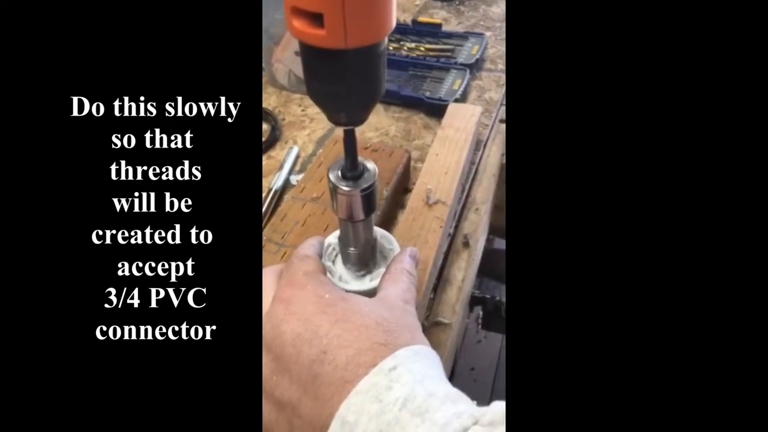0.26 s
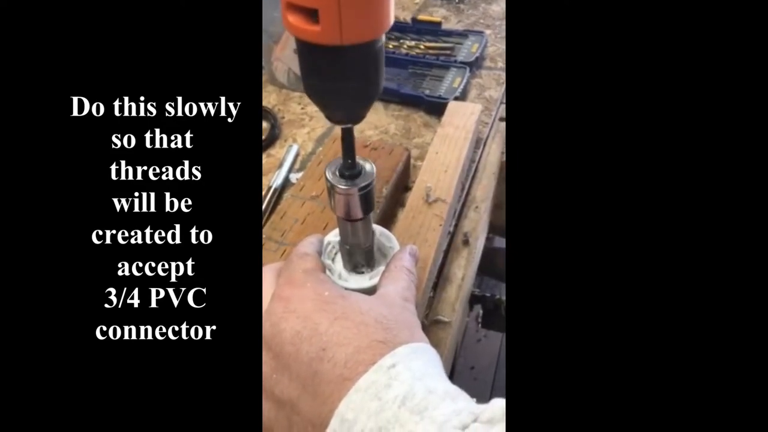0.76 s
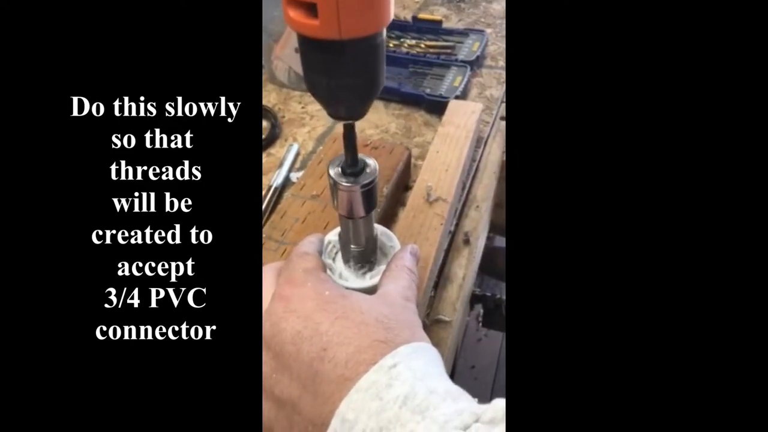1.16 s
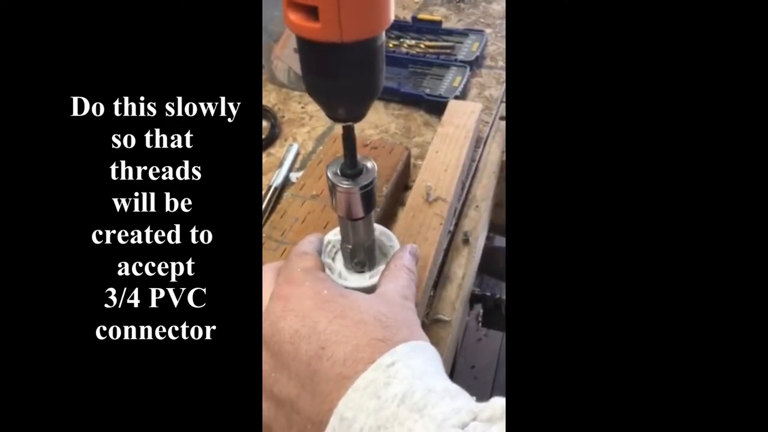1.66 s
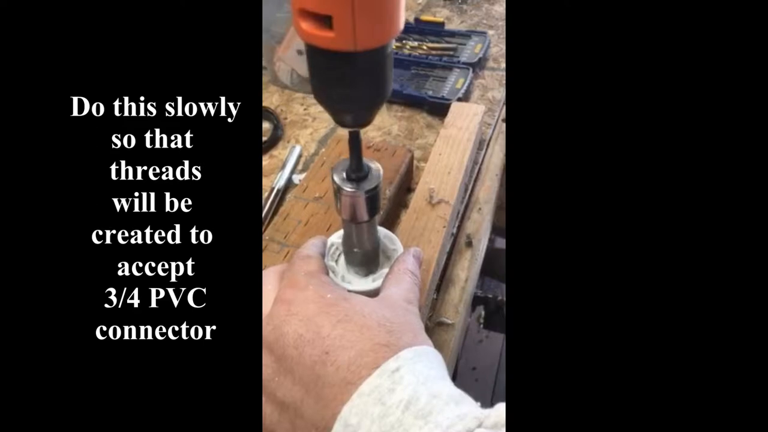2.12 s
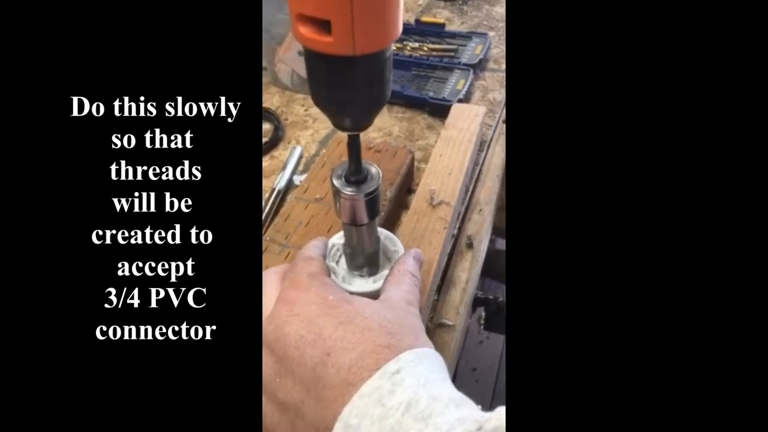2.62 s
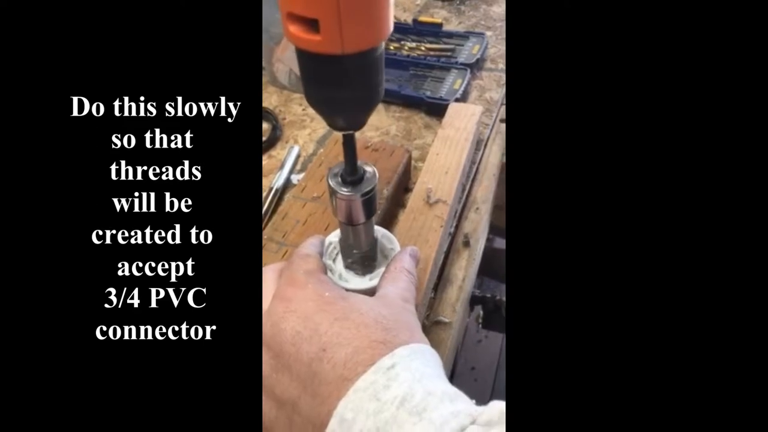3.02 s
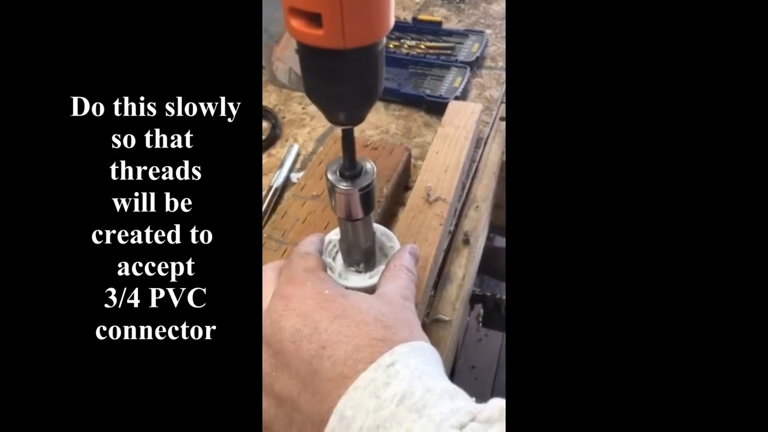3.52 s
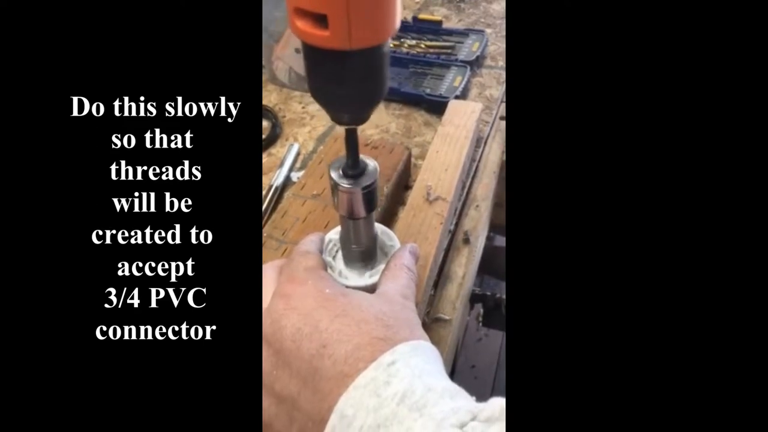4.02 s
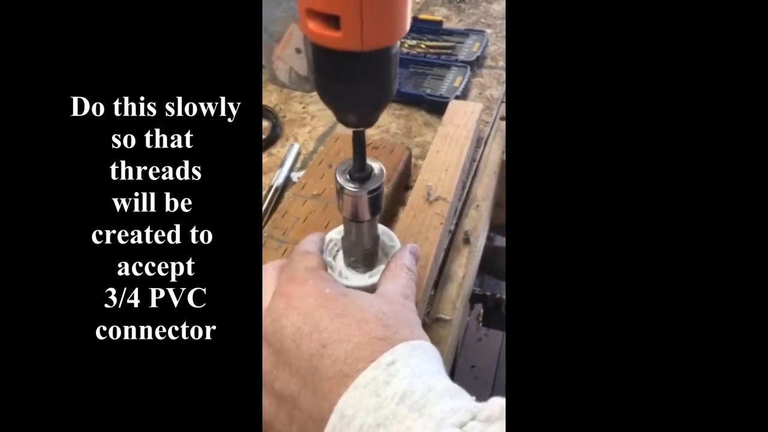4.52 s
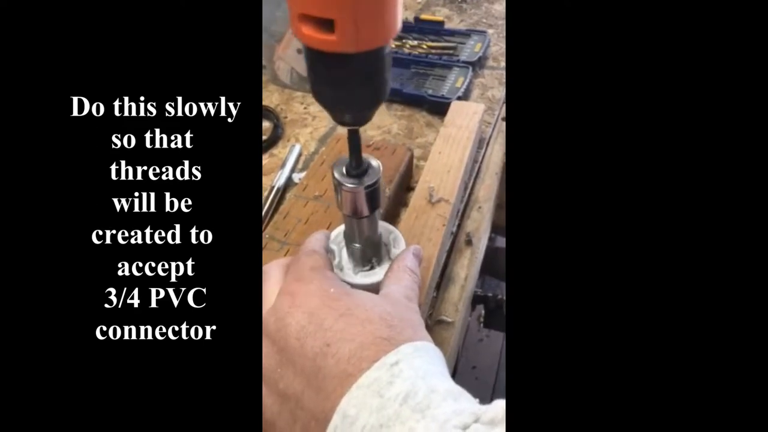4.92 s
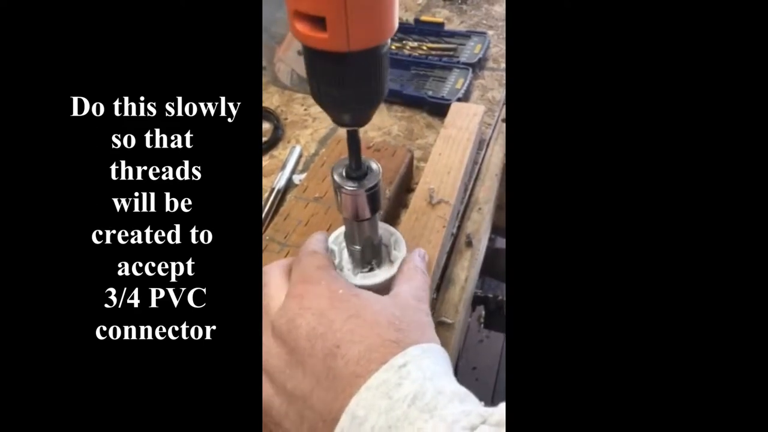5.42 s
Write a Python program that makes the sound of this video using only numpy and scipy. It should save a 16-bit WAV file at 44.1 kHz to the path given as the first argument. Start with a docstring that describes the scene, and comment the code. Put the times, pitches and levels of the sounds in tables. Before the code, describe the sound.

A cordless drill drives a threading tap into a plastic fitting, close to the microphone in a small dry workshop. It opens with a half-second run, the clutch ratcheting in a quick rattle, then continues in short bursts, two or three a second. Louder, faster bursts at about 1.3, 2.2, 4.0 and 4.5 seconds rise to a rasping buzz and fall away in a brief whine. Softer rattles fill the stretch from 2.5 to 3.8 seconds. Sharp clicks of the trigger, chuck and biting tap mark the bursts, over faint plastic scraping. The fitting thuds on the workbench, hardest at around 1.45 seconds. A last strong burst comes near 4.9 seconds, and the work stops with a few ticks by 5.2 seconds. Quiet room air and a low hum remain, with one small click and a very faint, high, wavering whistle around 5.5 seconds.

```python
"""A workbench in a small dry room: close in front of the microphone, a cordless drill drives a threading tap
into a hand-held plastic fitting, in squeezes of the trigger. Under the load its clutch ratchets: clicks when slow,
a rattle when faster, a rasping buzz at the top, made of impulses that ring the gearbox and the tap.
Random knocks and hard jolts excite bench modes, the trigger and slack chuck tick, filtered noise grains scrape.
Behind it lie shaped noise for the workshop air, a low sine hum and a faint wavering whistle."""
import sys
import numpy as np
from scipy import signal
from scipy.fft import rfft, irfft
from scipy.io import wavfile
from scipy.ndimage import uniform_filter1d

SR = 44100
rng = np.random.default_rng(int(sys.argv[2]) if len(sys.argv) > 2 else 0)


def write(x):
    x = np.atleast_2d(x).T
    wavfile.write(sys.argv[1], SR, np.round(np.clip(x, -1, 1) * 32767).astype(np.int16))


N = 250047
TIME = np.arange(N) / SR  # seconds


def undb(db):
    """Decibels to gain."""
    return 10 ** (np.asarray(db) / 20)


def curves(rows):
    """Each column of a table, joined by straight lines in time."""
    times, *columns = np.transpose(sorted(map(tuple, rows)))
    return [np.interp(TIME, times, column) for column in columns]


def unit(x):
    """Scale to rms 1."""
    return x / np.sqrt(np.mean(x ** 2))


def wander(rate_hz):
    """A random curve with a spread near 1: random points, rate_hz a second, joined by straight lines."""
    knots = np.arange(0, N / SR + 1, 1 / rate_hz)
    return 1.2 * np.interp(TIME, knots, rng.standard_normal(len(knots)))


def through(x, impulse_response):
    """Pass a sound through an impulse response."""
    return signal.fftconvolve(x, impulse_response)[:N]


def response(colour, rings=(), size=8192):
    """Causal (minimum-phase) impulse response of unit energy from a broad colour and resonances."""
    hz = np.maximum(np.arange(size // 2 + 1) * SR / size, 1)
    points_hz, points_db = np.transpose(colour)
    db = np.interp(np.log(hz), np.log(points_hz), points_db)
    for centre, width, height in rings:
        db = db + height / (1 + (2 * (hz - centre) / width) ** 2)
    # folding the cepstrum forward in time makes the response causal
    cepstrum = irfft(np.log(undb(db)))
    cepstrum[1:size // 2] *= 2
    cepstrum[size // 2 + 1:] = 0
    h = irfft(np.exp(rfft(cepstrum)))
    return h / np.linalg.norm(h)


def fade(t60):
    """Exponential decay down to -60 dB in t60 seconds."""
    return np.exp(-np.log(1000) * TIME[:int(t60 * SR) + 2] / t60)


def tail(t60):
    """Dense room reflections of unit energy: decaying noise."""
    decay = fade(t60)
    h = decay * rng.standard_normal(len(decay))
    return h / np.linalg.norm(h)


def impulses(times, sizes, order=6):
    """Band-limited impulses at exact times, between the samples too."""
    place = np.asarray(times)[:, None] * SR
    index = place.astype(int) + np.arange(-order, order + 1)
    shape = np.sinc(index - place) * np.sinc((index - place) / (order + 1))
    weights = np.asarray(sizes)[:, None] * shape
    return np.bincount(np.clip(index, 0, N - 1).ravel(), weights.ravel(), N)


def chatter(pulses, t60):
    """Loose parts buzz briefly after each blow, with the energy of the blow."""
    decay = fade(t60) ** 2
    energy = np.abs(through(pulses ** 2, decay / decay.sum()))
    return np.sqrt(energy) * rng.standard_normal(N)


def disperse(x, spread_s, size=4096):
    """Bending waves reach the air by many paths: each frequency comes a little late, none is louder."""
    bins = np.arange(size // 2 + 1)
    delay = spread_s * np.interp(bins, np.linspace(0, size // 2, 60), rng.random(60))
    phase = -2 * np.pi * np.cumsum(delay) * SR / size
    lead = size // 8  # room for what the filter spreads ahead of its centre
    h = np.roll(irfft(np.exp(1j * phase)), lead)
    return signal.fftconvolve(x, h)[lead:lead + N]


# The colour of the workshop air behind the bench.
# Each row: frequency in Hz, relative density in dB per Hz.
SHOP_AIR = [(30, -23), (65, -4), (110, -10), (200, -14), (480, -29), (1800, -30.5), (3000, -36),
            (6500, -43.5), (10000, -45)]
# A faint whistle in the background, coming up after the drilling; the end values hold outside the rows.
# Each row: time in seconds, frequency in Hz, peak level in dB.
WHISTLE_PATH = [(5.33, 7590, -90.5), (5.36, 7950, -69), (5.39, 8100, -70.5), (5.42, 7870, -65),
                (5.455, 7470, -81), (5.49, 7700, -76), (5.515, 8270, -72.5), (5.56, 8700, -100),
                (5.62, 8250, -76), (5.67, 6870, -82.5)]


def workshop(air_db=-52.5, side_db=-30.0, hum_hz=61, hum_db=-50):
    """Quiet room air as shaped noise, a low machine hum as a sine and a thin whistle as a gliding sine."""
    colour = response(SHOP_AIR)
    mid = unit(through(rng.standard_normal(N), colour))
    side = unit(through(rng.standard_normal(N), colour))
    air = undb(air_db) * (mid + undb(side_db) * side * np.array([[1], [-1]]))
    hum = np.sqrt(2) * undb(hum_db) * np.sin(2 * np.pi * hum_hz * TIME)  # hum_db is its rms
    whistle_hz, whistle_db = curves(WHISTLE_PATH)
    whistle = undb(whistle_db) * np.sin(2 * np.pi * np.cumsum(whistle_hz) / SR)
    return air + hum + whistle


def scrape(rate_hz, level_db=-54, turning_db=4, grain_db=3, flicker_db=3):
    """The tap and the gripping hand rub on the plastic in a dull, uneven rustle, louder while the tap turns."""
    chance = rng.standard_normal((N // 10, 2))
    sizes = chance[:, 0] * undb(grain_db * chance[:, 1])
    grains = impulses(rng.uniform(0, N / SR, len(chance)), sizes)
    plastic = response([(100, -17.5), (280, -11.5), (450, -11), (1100, -9.0), (2000, -7.5), (4000, -8),
                        (7000, -16.0), (10000, -24.0)], TOOL_RINGS)
    rustle = unit(disperse(through(grains, plastic), spread_s=.002))
    turning = np.clip((rate_hz - CRAWL_HZ) / 100, 0, 1)
    working = np.clip((5.2 - TIME) / .08, 0, 1)  # silent from 5.2 s on
    return rustle * undb(level_db + turning_db * turning + flicker_db * wander(rate_hz=17)) * working


# The modes of the workbench under the fitting.
# Each row: frequency in Hz, width in Hz, relative level in dB.
BENCH_MODES = [(74, 78, 0), (92.8, 26, 1), (136, 92, -3.5), (163, 41, 0.5), (199, 27, -6), (287, 55, -7.5),
               (407, 102, -16), (650, 270, -17)]
# Hard jolts of the fitting against the bench.
# Each row: time in seconds, relative peak level in dB.
FITTING_JOLTS = [(.134, -25.5), (1.403, -18), (1.435, -8.5), (1.456, -5.5), (1.483, -16), (1.53, -20),
                 (1.97, -28), (2.208, -22), (2.295, -13), (2.333, -17.5), (3.561, -21.5), (4.071, -18),
                 (4.134, -20.5), (4.526, -20), (4.596, -17), (5.02, -22)]


def bench(rumble_db, grain_db=4, trim_db=-5.0, jolt_db=-1):
    """The shaking fitting bumps on the bench: many small knocks ring its modes, a few hard jolts thud."""
    t = TIME[:SR // 4]
    modes = 0
    for k, (hz, width, db) in enumerate(BENCH_MODES):
        ringing = np.exp(-np.pi * width * t) * np.sin(2 * np.pi * hz * t)
        modes = modes + undb(db) * np.sqrt(width) * ringing * (-1) ** k
    chance = rng.standard_normal((N // 150, 2))
    knock_times = np.sort(rng.uniform(0, N / SR, len(chance)))
    knocks = impulses(knock_times, np.sign(chance[:, 0]) * undb(grain_db * chance[:, 1]))
    working = np.clip((5.2 - TIME) / .1, 0, 1)  # silent from 5.2 s on
    rumble = unit(through(knocks, modes)) * undb(rumble_db + trim_db) * working
    jolt_times, peak_db = np.transpose(FITTING_JOLTS)
    thud = response([(25, -29.5), (60, 5.5), (100, 4), (220, -3.0), (400, -16), (900, -30.5), (3000, -46.5)])
    jolts = through(impulses(jolt_times, undb(peak_db + jolt_db)), thud / np.abs(thud).max())
    return rumble + jolts


# Bright clicks of the trigger and the slack chuck, close to the microphone.
# Each row: time in seconds, relative level of the metal snap in dB, relative level of the housing knock in dB.
TRIGGER_AND_CHUCK = [(.016, -33.5, -45), (.031, -33, -24), (.541, -39, -47), (.8824, -31, -37),
                     (1.2, -33.5, -48), (1.231, -31, -18.5), (1.6836, -37, -42), (1.697, -32, -54),
                     (2.097, -31, -36), (2.5303, -32, -24), (2.566, -33.5, -22), (2.8659, -34.5, -41),
                     (3.401, -37, -48), (3.4149, -33.5, -22), (3.681, -35.5, -51), (3.6973, -34, -24),
                     (3.9308, -30, -32), (4.3324, -35.5, -35), (4.7522, -30, -30), (4.7674, -21, -24),
                     (4.8157, -38.5, -40), (5.1272, -30, -39), (5.1736, -52, -44), (5.5127, -47, -27)]
# Hard single jumps of the clutch as the tap bites.
# Each row: time in seconds, relative level of the tool's ring in dB.
TAP_BITES = [(.601, -9.5), (.921, -10.5), (1.2721, -6), (1.733, -17), (2.134, -8), (2.7516, -14),
             (2.9165, -11), (3.0985, -7.5), (3.467, -12), (3.8075, -13.5), (3.95, -14), (4.3687, -11),
             (4.3992, -9.5), (4.7653, -11), (4.8349, -12)]
CLICK_RING_DB = 12  # ring of the tool against the row's snap
BITE_SNAP_DB, BITE_KNOCK_DB = -38, -24  # against the row's ring


def ticks(ring_db=6, snap_db=12, knock_db=5, chatter_db=1):
    """Trigger, slack chuck and biting tap: a ring of the tool, a bright metal snap, a dull housing knock."""
    clicks = [(s, snap + CLICK_RING_DB, snap, knock) for s, snap, knock in TRIGGER_AND_CHUCK]
    bites = [(s, ring, ring + BITE_SNAP_DB, ring + BITE_KNOCK_DB) for s, ring in TAP_BITES]
    times, rings, snaps, knocks = np.transpose(clicks + bites)
    tool = response(TOOL_BODY, TOOL_RINGS)
    steel = response([(200, -15.0), (1300, -11), (2200, -1), (4300, 12.0), (6500, 6), (10000, -2.0)])
    housing = response([(100, 0.0), (300, 18.0), (500, -1), (1300, 0.5), (2000, -3), (4000, -24),
                        (10000, -39)], TOOL_RINGS)
    out = 0
    for db, colour in (rings + ring_db, tool), (snaps + snap_db, steel), (knocks + knock_db, housing):
        blows = impulses(times, undb(db))
        out = out + through(blows + undb(chatter_db) * chatter(blows, t60=.03), colour)
    return disperse(out, spread_s=0.000996)


def jumps(rate_hz, lock, strain, wobble=.005, strain_wobble=.045, slop=0.019, locked_slop=.008,
          scatter_db=1.16, rebound=0.99, locked_rebound=0.73):
    """The clutch balls land once a tooth, slightly out of step, and rebound a moment later."""
    # straining up to speed, the drive snatches and slips
    unsteady = 1 + (wobble + strain_wobble * strain) * wander(rate_hz=70)
    teeth = np.cumsum(rate_hz * unsteady) / SR
    times = np.interp(np.arange(1, int(teeth[-1])), teeth, TIME)
    rate = np.interp(times, TIME, rate_hz)
    locked = np.interp(times, TIME, lock)
    shift, strength, flight, bounce = rng.standard_normal((len(times), 4)).T
    # slop is a share of the cycle
    times = times + (slop + locked * (locked_slop - slop)) * shift / rate
    sizes = undb(scatter_db * strength) / np.sqrt(rate)  # even power at every rate
    rebound_times = times + 0.0009335 * np.exp(0.445 * flight)
    rebound_sizes = sizes * (rebound + locked * (locked_rebound - rebound)) * undb(2 * bounce)
    return unit(impulses(times, sizes) + impulses(rebound_times, rebound_sizes))


def seating(x, depth_db=3, rate_hz=50):
    """The balls and the tap keep shifting in their seats: each region of resonances swells on its own."""
    centres = [300, 620, 1070, 1450, 2000, 2650, 3000, 3450, 4200, 5700, 9000]  # Hz
    hz, spectrum = np.fft.rfftfreq(N, 1 / SR), rfft(x)
    out = 0
    for share in np.eye(len(centres)):
        band = irfft(spectrum * np.interp(hz, centres, share), N)
        out = out + band * undb(depth_db * wander(rate_hz))
    # the energy of the blows is only shared out differently
    before, after = (np.abs(uniform_filter1d(v ** 2, size=900)) + 1e-12 for v in (x, out))
    return out * np.sqrt(before / after)


# The broad colour of gearbox, chuck and tap, heard close in front.
# Each row: frequency in Hz, relative level in dB.
TOOL_BODY = [(120, -25), (280, -11), (450, -18.5), (850, -17), (1300, -13), (1900, -13.5), (2300, -7),
             (2700, -1.5), (3400, -6), (4400, -11.5), (5000, -22.5), (6100, -24.5), (7400, -35.5),
             (9000, -38.5), (10300, -39)]
# Their resonances, added to a broad colour.
# Each row: frequency in Hz, width in Hz, height over the colour in dB.
TOOL_RINGS = [(612, 80, 9), (1070, 75, 6.5), (1400, 160, 4), (1690, 70, 2), (2470, 80, 2), (2710, 130, 3.3),
              (2860, 100, 3.3), (3080, 170, -3), (3350, 150, 3), (3500, 80, 2), (3810, 70, 2),
              (4090, 90, 3), (5305, 90, 3), (5780, 200, 4), (9950, 500, 3)]


def clutch(rate_hz, level_db, trim_db=-1.0, loose_chatter_db=-5, locked_chatter_db=-10, growl_db=-19.5):
    """A click for each tooth jumped; at speed, as the drive eases off, clicks lock into a falling whine."""
    fast = np.clip((rate_hz - 330) / 350, 0, 1)
    pull = uniform_filter1d(np.gradient(rate_hz) * SR, size=1500)  # Hz per second
    lock = fast * np.clip(.7 - pull / 4500, .1, 1)
    # at a crawl the balls ride over the teeth without a click
    running = np.clip((rate_hz - 48) / 30, 0, 1)
    pulses = jumps(rate_hz, lock, strain=fast - lock) * undb(level_db + trim_db) * running
    buzz = chatter(pulses, t60=.02)
    chatter_db = loose_chatter_db + lock * (locked_chatter_db - loose_chatter_db)
    force = pulses + undb(chatter_db) * buzz
    # harder blows are shorter: less middle, more treble
    hardness = np.clip((level_db + 24.5) / 8, 0, 1)
    hard_colour = response([(300, -1.0), (800, -13), (1500, -4.5), (2700, -2.0), (4400, 2.5), (5500, 2),
                            (7500, 3.5), (10000, 8.5), (13000, -28.5), (20000, -12.0)])
    hard = undb(2.5) * through(force, hard_colour)
    blows = (1 - hardness) * force + hardness * hard
    ring = through(blows, response(TOOL_BODY, TOOL_RINGS))
    # the housing and the fitting shake along, roughly
    shell = response([(150, -9), (600, 3.5), (900, 2.0), (1500, -12.5), (2200, -4), (4000, -34.5)], TOOL_RINGS)
    growl = through(buzz * hardness, shell)
    return seating(disperse(ring, spread_s=0.001664) + undb(growl_db) * growl)


INERTIA_S, CRAWL_HZ = .03, 30.05  # the motor rounds off each change of speed; lowest clutch rate
RATTLE_DB_PER_OCTAVE, RUMBLE_DB_PER_OCTAVE = 7.5, 14.5  # growth with speed
RUMBLE_LAG_S, GRIP_RUMBLE_DB = 0.054, -42.5  # the bench follows late; the hand alone keeps it stirring
FULL_FORCE_HZ, SOFT_JUMP_DB = 230.6, -8  # below this rate jumps soften, toward this change at zero rate
# Squeezes of the drill's trigger at the bench; the top values are those of full speed, before any trim.
# Each row: start in seconds, run-up in seconds, hold in seconds, run-down in seconds,
# top clutch rate in Hz, relative rattle level at the top in dB, relative bench rumble level at the top in dB.
TRIGGER_SQUEEZES = [ (0.023, 0.11, 0.26, 0.13, 364.8, -21, -33), (.538, 0.15, 0.028, .161, 379.9, -20, -30),
                    (0.873, 0.1, .062, 0.12, 348, -21, -33.5),
                    (1.208, 0.14, 0.055, 0.29, 913.6, -15, -21.5),
                    (1.689, 0.14, 0.049, 0.15, 429.2, -19, -37),
                    (2.1, 0.12, 0.055, 0.23, 842.7, -14.5, -23), (2.558, 0.1, 0.06, .064, 275.7, -22, -44),
                    (2.851, 0.11, 0.061, .085, 286, -22.5, -36.5),
                    (3.09, .014, 0.058, .1, 180.6, -25.5, -42),
                    (3.091, .133, 0.053, 0.11, 340.5, -21, -31.5),
                    (3.411, .11, .043, .108, 362.4, -20, -32), (3.64, 0.17, 0.0098, 0.055, 192.2, -22, -46),
                    (3.92, 0.11, .044, 0.23, 838, -14, -21.5),
                    (4.339, 0.13, 0.039, 0.18, 912.6, -12.8, -22.5),
                    (4.801, 0.12, 0.055, 0.09, 600.8, -14.5, -33.5),
                    (5.052, .02, .04, .02, 110.9, -44.5, -37)]


def drive():
    """Each squeeze runs the motor up, holds it and lets it run down; rattle and rumble grow with speed."""
    rate_hz, rattle_db, rumble_db = CRAWL_HZ, -np.inf, GRIP_RUMBLE_DB
    for start, up, hold, down, top_hz, top_rattle_db, top_rumble_db in TRIGGER_SQUEEZES:
        trigger = np.interp(TIME, start + np.cumsum([0, up, hold, down]), [0, 1, 1, 0])
        speed = np.maximum(uniform_filter1d(trigger, size=int(INERTIA_S * SR)), 1e-6)
        octaves = np.log2(speed)
        late_octaves = np.interp(TIME - RUMBLE_LAG_S, TIME, octaves)
        # where squeezes overlap, the stronger one counts
        rate_hz = np.maximum(rate_hz, top_hz * speed)
        rattle_db = np.maximum(rattle_db, top_rattle_db + RATTLE_DB_PER_OCTAVE * octaves)
        rumble_db = np.maximum(rumble_db, top_rumble_db + RUMBLE_DB_PER_OCTAVE * late_octaves)
    softness = np.clip(1 - rate_hz / FULL_FORCE_HZ, 0, 1)
    return rate_hz, rattle_db + SOFT_JUMP_DB * softness, rumble_db


def scene(room_db=-22, side_db=-11, pan_db=-0.23):
    """The drill close in front, in a small dry room; the two sides differ a little, most of all in the treble."""
    rate_hz, rattle_db, rumble_db = drive()
    tool = scrape(rate_hz) + bench(rumble_db) + ticks() + clutch(rate_hz, rattle_db)
    mid = tool + undb(room_db) * through(tool, tail(t60=0.11))
    width = response([(60, -17), (300, -9.5), (1200, -5.0), (2800, -14.5), (4500, -7.0), (8000, -2), (11000, 4)])
    side = undb(side_db) * through(through(tool, width), tail(t60=.09))
    return np.array([(mid + side) * undb(pan_db), mid - side]) + workshop()


def record(dry):
    """The microphone loses the deepest bass, rounds the highest peaks and cuts the top."""
    bass_cut = signal.butter(3, 36, "high", fs=SR, output="sos")
    sound = signal.sosfilt(bass_cut, dry)
    sound = np.tanh(1.2 * sound) / 1.2
    top_cut = signal.ellip(12, .2, 80, 10550, fs=SR, output="sos")  # edge at 10550 Hz
    return signal.sosfilt(top_cut, sound)


dry = scene()
out = record(dry)
write(out)
```